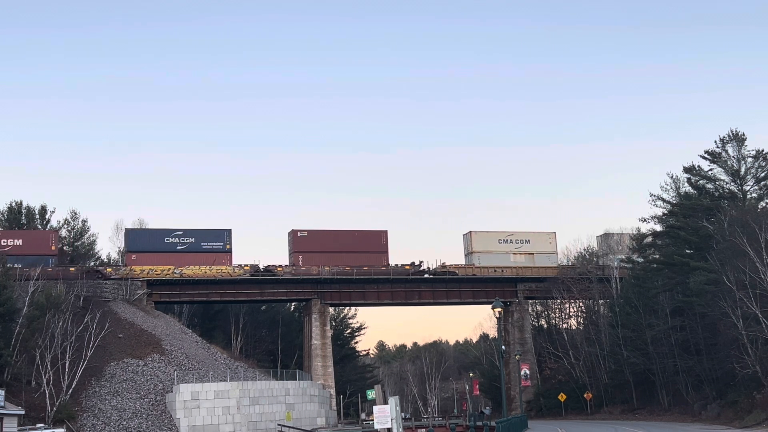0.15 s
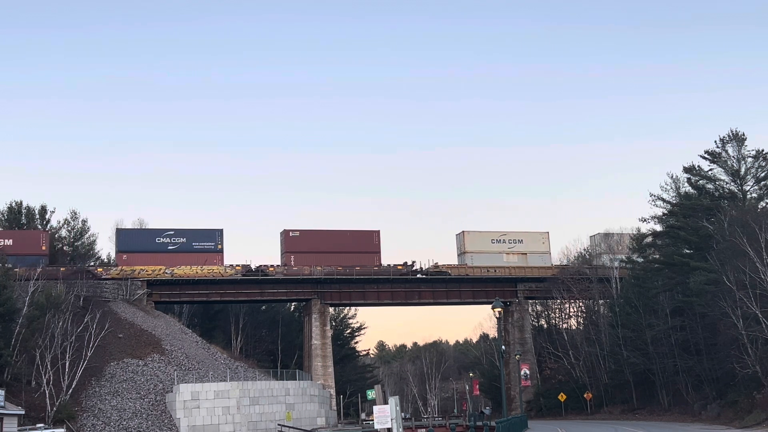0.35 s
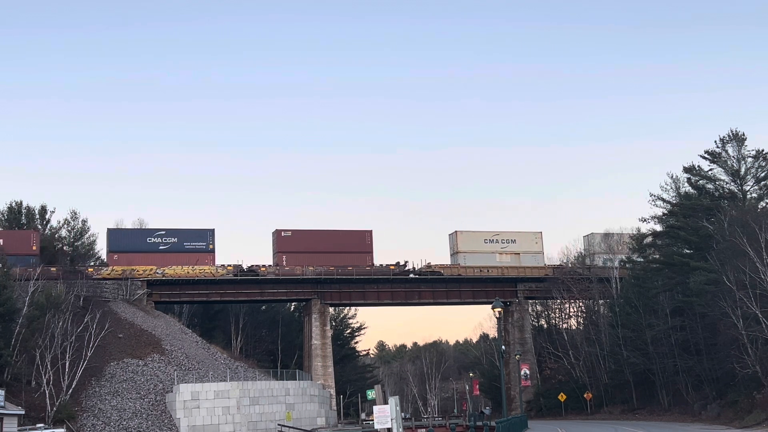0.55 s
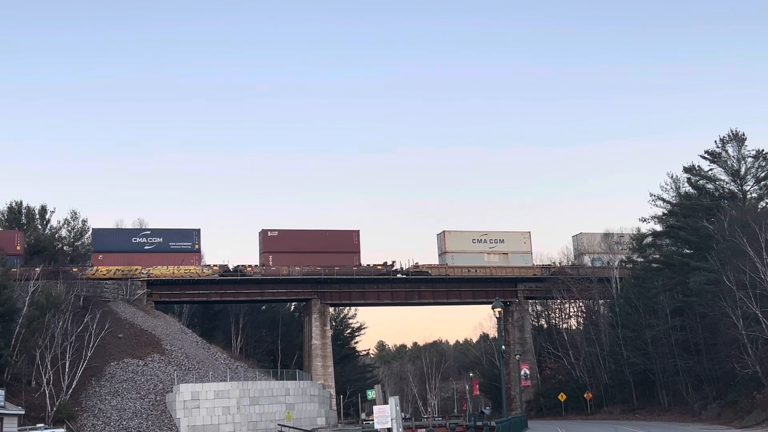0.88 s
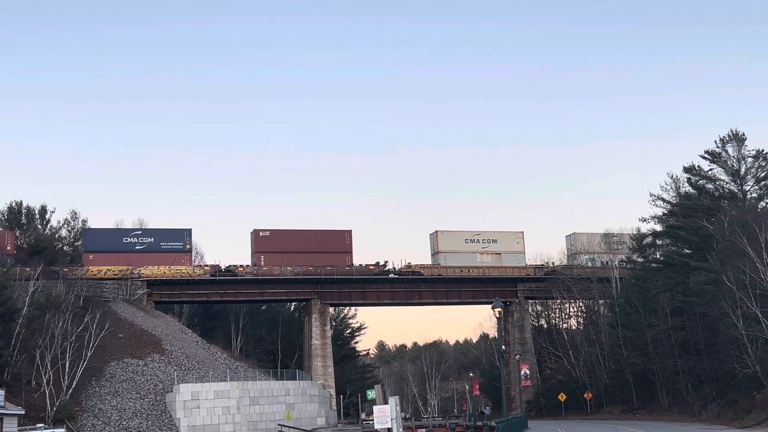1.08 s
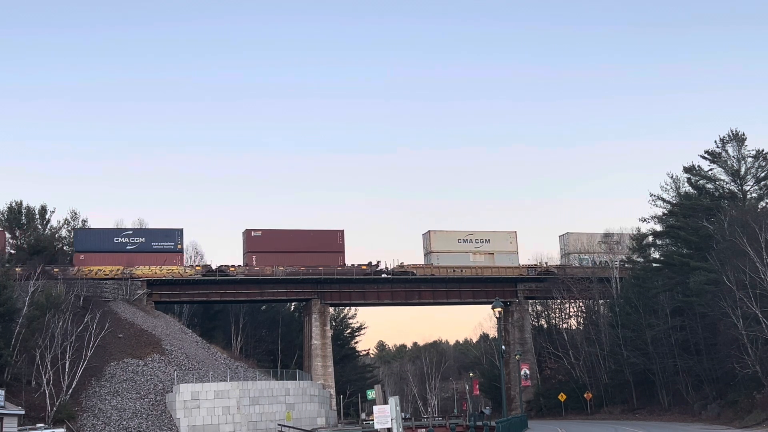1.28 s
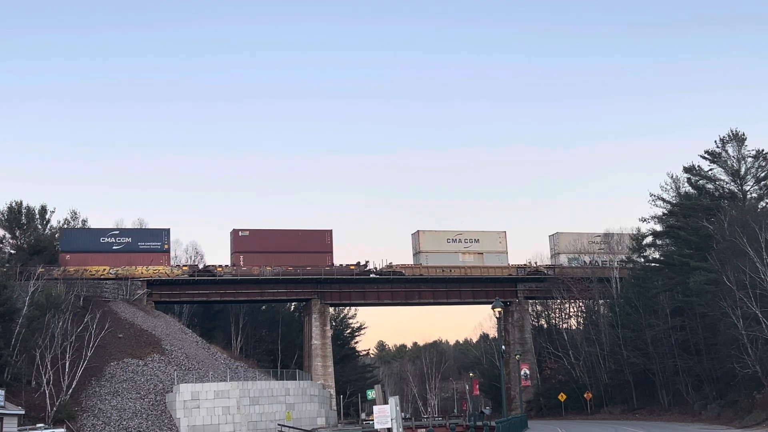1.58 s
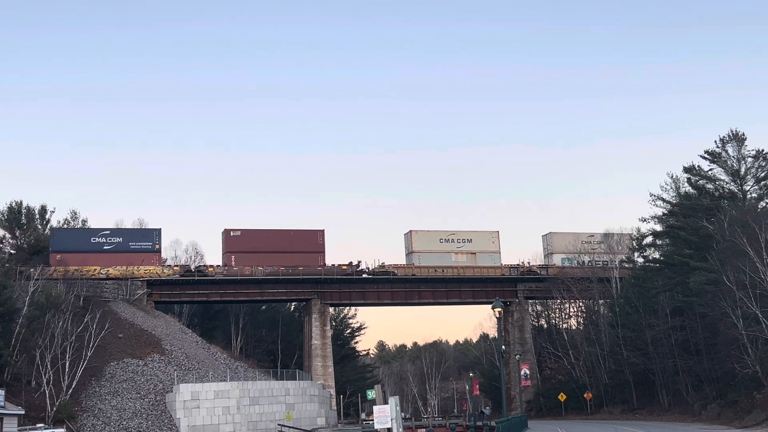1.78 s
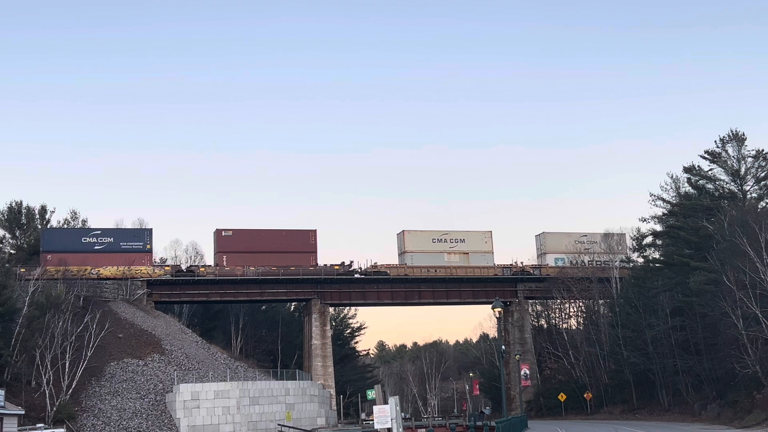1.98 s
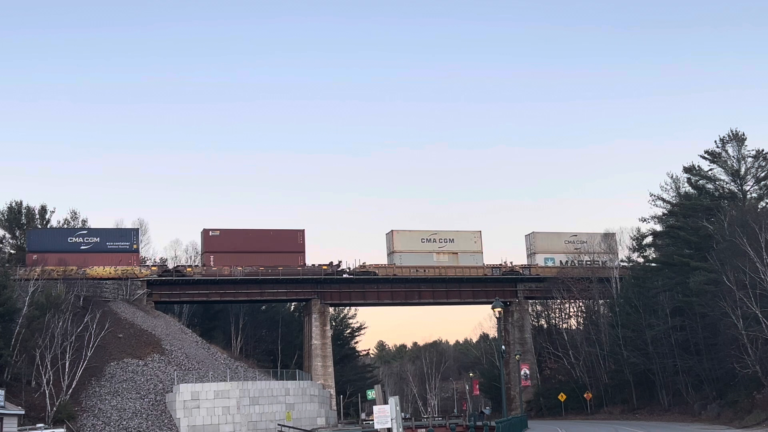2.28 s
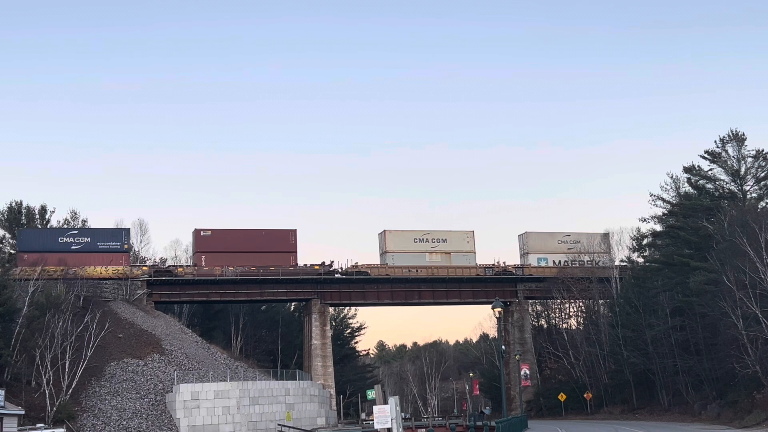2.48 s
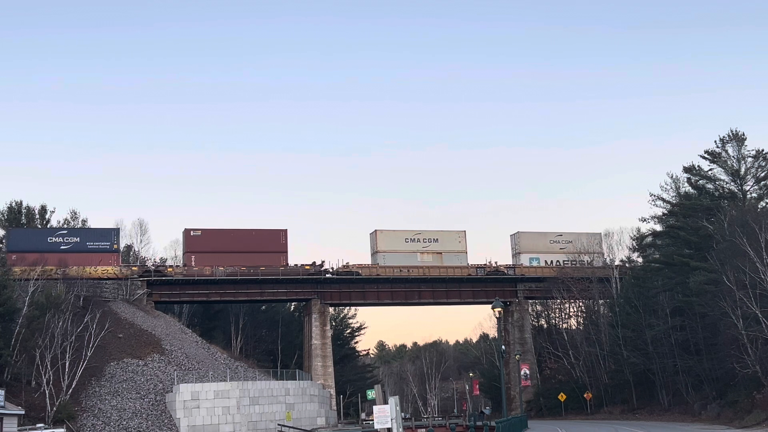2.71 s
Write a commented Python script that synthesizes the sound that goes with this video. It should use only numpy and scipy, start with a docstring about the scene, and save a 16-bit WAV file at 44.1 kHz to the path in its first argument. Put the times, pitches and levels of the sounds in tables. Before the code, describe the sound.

A slow freight train booms across a steel bridge above the listener, axles thudding irregularly over a low drone and light rail hiss. Something small rattles once nearby, then the cars clank far off.

```python
"""A freight train rolls slowly over a steel girder bridge, heard from the road below.
The wheels keep the spans booming, with heavier thuds as loaded axles cross; above that lie a drone
and the roar and hiss of wheel on rail. Steel rings, a wheel sings briefly and cars clank far off.
Something small rattles once close by, with faint rustles, and a few thin, high chirps, probably
a bird's, echo from the trees."""
import sys
import numpy as np
from scipy import signal
from scipy.fft import rfft, irfft, next_fast_len
from scipy.io import wavfile
from scipy.ndimage import uniform_filter1d

SR = 44100
rng = np.random.default_rng(int(sys.argv[2]) if len(sys.argv) > 2 else 0)


def waveform_to_disk(signal):
    """Save audio, clipped to [-1, 1], as 16-bit WAV at the path in sys.argv[1]."""
    frames = np.transpose(np.atleast_2d(signal))
    scaled = np.clip(frames, -1, 1) * 32767
    samples = np.round(scaled).astype(np.int16)
    wavfile.write(sys.argv[1], SR, samples)


N = 125685
TIME = np.arange(N) / SR


# How loud the spans boom. Each row: time in seconds, level in dB.
BOOM_LEVEL = [(0, -23.5), (.06, -37), (.2, -31), (.34, -35), (.44, -29), (.55, -34), (.76, -29),
              (.92, -35.5), (1.1, -31), (1.19, -31.5), (1.255, -40), (1.31, -27), (1.52, -32),
              (1.58, -41.5), (1.68, -27.5), (1.84, -39.5), (2.15, -30), (2.3, -32.5), (2.5, -31.5),
              (2.85, -30)]
# The boom's tone. Each row: frequency in Hz, relative level in dB.
BOOM_TONE = [(18, -50.5), (25, -27.5), (32, -13.5), (41, -5.5), (53, 1), (71, -0.5), (88, -9.5), (115, -9),
             (170, -25.5), (300, -88)]
def boom():
    """The wheels keep the bridge spans shaking."""
    return rolling(BOOM_LEVEL, BOOM_TONE, flutter_db=-2.5)


# Axle thuds. Each row: time in seconds, peak level in dB, pitch in Hz.
THUDS = [(0.106, -18, 72.8), (.149, -20.5, 60), (.279, -14.5, 71.5), (0.4, -19.5, 66.6), (0.761, -15, 59.5),
         (0.993, -25, 72), (1.159, -23, 101.6), (1.189, -18, 59), (1.429, -22.5, 78), (1.528, -22, 61.6),
         (1.928, -20, 63.4), (2.042, -18.5, 55), (2.119, -23, 71), (2.179, -16.5, 69), (2.209, -18, 69.5),
         (2.343, -18.5, 67), (2.521, -27.5, 72), (2.712, -18.5, 57.3)]
def thuds():
    """A heavy axle swings a span for a few cycles."""
    out = np.zeros(N)
    for s, db, hz in THUDS:
        swing = np.cos(2 * np.pi * (hz * (TIME - s) + rng.random()))
        out += from_db(db) * swell(s, rise_s=.017, fall_s=.016) * swing
    return out


# How loud the drone is. Each row: time in seconds, level in dB.
DRONE_LEVEL = [(0, -36.5), (.12, -35.5), (.35, -38), (.48, -36.5), (.66, -35), (.95, -37.5), (1.18, -37.5),
               (1.4, -37.5), (1.58, -38), (1.76, -36), (2.02, -38.5), (2.28, -35), (2.5, -36.5),
               (2.85, -37)]
# Its tone. Each row: frequency in Hz, relative level in dB.
DRONE_TONE = [(40, -50.5), (80, -3.5), (120, 2), (150, -4.5), (185, -11), (290, -12), (400, -18),
              (600, -29), (1500, -82.5)]
def drone():
    """The rolling keeps up a low drone."""
    return rolling(DRONE_LEVEL, DRONE_TONE, flutter_db=.94)


# How loud the roar is. Each row: time in seconds, level in dB.
ROAR_LEVEL = [(0, -49), (.6, -50), (.95, -50), (1.3, -50.5), (1.58, -52.5), (1.7, -49.5), (1.94, -50.5),
              (2, -48.5), (2.3, -47.5), (2.6, -48.5), (2.85, -47.5)]
# Its tone. Each row: frequency in Hz, relative level in dB.
ROAR_TONE = [(100, -44.5), (280, -9), (480, 0), (700, 0.5), (980, -0.5), (1400, -5.5), (1900, -13.5),
             (3000, -36), (6000, -68)]
def roar():
    """Wheels roar on the rails, a touch louder on the right."""
    return rolling(ROAR_LEVEL, ROAR_TONE, flutter_db=2) * from_db([[-.3], [.3]])


# How loud the hiss is. Each row: time in seconds, level in dB.
HISS_LEVEL = [(0, -57), (.5, -58.5), (.68, -58.5), (.9, -62), (1.15, -58.5), (1.45, -58), (1.58, -62.5),
              (1.7, -59.5), (1.87, -56), (1.97, -60), (2.2, -57.5), (2.55, -59.5), (2.7, -58.5), (2.8, -55)]
# Its tone. Each row: frequency in Hz, relative level in dB.
HISS_TONE = [(400, -31), (1000, -7), (1900, -0.5), (2700, -5), (3500, -12.5), (4800, -19), (5700, -25.5),
             (7000, -29), (9500, -42), (12500, -47.5)]
def hiss():
    """The rails hiss under the wheels."""
    return rolling(HISS_LEVEL, HISS_TONE, flutter_db=1.28)


# Ringing steel. Each row: pitch in Hz, width in Hz, level in dB, left-right likeness (1 = same).
RINGS = [(72.37, 11, -42, 1), (248, 2.6, -57, 0.94), (490, 2.2, -66, 0), (1850, 190, -68, 1),
         (2870, 64, -79, 0.61)]
def steel_rings():
    """The rolling keeps wheels and steelwork ringing."""
    return sum(from_db(db) * noise_band(hz - width / 2, hz + width / 2, alike, order=2)
               for hz, width, db, alike in RINGS)


# Far clanks. Each row: time in seconds, peak level in dB, middle frequency in Hz, width in Hz.
CLANKS = [(0.097, -40, 303, 168), (1.646, -63, 3290, 1900), (2.047, -46.5, 1043, 553),
          (2.069, -53, 2010, 738), (2.159, -47, 853, 488), (2.275, -48, 1050, 450),
          (2.285, -38.5, 295, 204), (2.765, -67, 4240, 2800)]
def clanks():
    """Wheels, couplings and car bodies bump, blurred by distance."""
    out = np.zeros((2, N))
    for s, db, hz, width in CLANKS:
        noise = noise_band(hz - width / 2, hz + width / 2, at_hz(LIKENESS, hz), order=3)
        out += from_db(db) * swell(s, rise_s=.012, fall_s=.04) * noise
    return out


# Wheel notes. Each row: start in seconds, length in seconds, pitch in Hz, level in dB.
WHEEL_NOTES = [(0.118, 0.17, 1780, -63.5), (0.112, 0.49, 2880, -69.5), (1.94, 0.16, 950, -51)]
def singing_wheel(fade_s=.048, waver_hz=14):
    """A wheel sticks and slips on the rail, holding a brief, wavering note."""
    out = np.zeros(N)
    for s, length, hz, db in WHEEL_NOTES:
        level = np.clip(np.minimum(TIME - s, s + length - TIME) / fade_s, 0, 1)
        out += from_db(db) * level * sine(hz + waver_hz * drift(60))
    return out


# The rattle's hits. Each row: start in seconds, knock strength in dB, tick strength in dB.
RATTLE_HITS = [(1.037, -28, -53), (1.0427, -27.5, -44.5), (1.049, -57, -46), (1.053, -37, -63),
               (1.0633, -40, -54)]
# Its notes. Each row: pitch in Hz, relative level in dB, seconds to fade by 60 dB.
RATTLE_NOTES = [(1220, -28, 0.0048), (1510, -3, 0.0079), (2050, -15, 0.0061), (4350, -14.5, 0.0046)]
# Its ticks' tone. Each row: frequency in Hz, boost or cut in dB.
TICK_TONE = [(2500, -14), (4500, 1.5), (8500, -6), (10200, -17), (12000, -5), (13300, -6), (15000, -18)]
def rattle(tick_s=.0005, soften_hz=2600):
    """Quick hits on a small object, each a short knock with a bright tick."""
    knocks, ticks = np.zeros(N), np.zeros(N)
    for s, knock_db, tick_db in RATTLE_HITS:
        knocks[int(s * SR)] += from_db(knock_db)
        ticks += from_db(tick_db) * (TIME >= s) * np.exp(-np.abs(TIME - s) / tick_s)
    body = sum(from_db(db) * ring(knocks, hz, fade_s) for hz, db, fade_s in RATTLE_NOTES)
    body = signal.sosfilt(signal.butter(2, soften_hz, fs=SR, output="sos"), body)
    hz = np.maximum(np.arange(N // 2 + 1) * SR / N, 1)
    ticks = irfft(rfft(ticks * rng.standard_normal(N)) * from_db(at_hz(TICK_TONE, hz)), N)
    body = with_echoes(body, echo_db=-3.5, fade_s=.089) * from_db([[-1.5], [1.5]])  # to the right
    return body + with_echoes(ticks, echo_db=-7, fade_s=.2)


# Chirps. Each row: start and length in seconds, first and last pitch in Hz, level in dB.
CHIRPS = [(0.386, 0.051, 6640, 7760, -73.5), (1.71, 0.032, 6850, 7350, -80),
          (1.942, 0.03, 6330, 6300, -65.5), (1.963, 0.2, 6230, 6500, -87), (2.73, 0.043, 6640, 7400, -77)]
def chirps(wobble_hz=90):
    """Thin, sliding whistles echo from the trees."""
    call = np.zeros(N)
    for s, length, start_hz, end_hz, db in CHIRPS:
        along = np.clip((TIME - s) / length, 0, 1)
        hz = start_hz + (end_hz - start_hz) * along + wobble_hz * drift(100)
        call += from_db(db) * np.sin(np.pi * along) * sine(hz)
    return with_echoes(call, echo_db=1, fade_s=.57)


# Faint rustles. Each row: time in seconds, peak level in dB, fall time in seconds.
RUSTLES = [(1.049, -80.5, 0.073), (1.304, -84, .025)]
def rustles():
    """Soft, very high hisses come with and after the rattle."""
    level = sum(from_db(db) * swell(s, rise_s=.032, fall_s=fall) for s, db, fall in RUSTLES)
    return level * noise_band(11600, 14000, alike=.92, order=2)


# How alike left and right sound. Each row: frequency in Hz, likeness (1 = same, 0 = unrelated).
LIKENESS = [(40, 1), (90, 0.97), (170, 0.96), (350, 0.81), (700, 0.61), (1500, 0.21), (2300, 0.91),
            (4500, 1), (9000, 0.39)]
def rolling(levels, tone, flutter_db, bands=9, steady_s=.058):
    """Rough wheels shake the steel: bands of noise flutter separately but share one level curve."""
    size = next_fast_len(N)
    hz = np.maximum(np.arange(size // 2 + 1) * SR / size, 1)
    mid, side = rfft(rng.standard_normal((2, size)))
    spectrum = from_db(at_hz(tone, hz)) * stereo(mid, side, at_hz(LIKENESS, hz))
    place = np.clip(np.log(hz / tone[0][0]) / np.log(tone[-1][0] / tone[0][0]), 0, 1)
    out = np.zeros((2, N))
    for band in range(bands):
        share = np.maximum(1 - np.abs(place * (bands - 1) - band), 0)  # neighbours overlap
        out += irfft(spectrum * share, size)[:, :N] * from_db(flutter_db * drift(15))
    power = uniform_filter1d(np.mean(out ** 2, axis=0), int(steady_s * SR))
    return out / np.sqrt(power) * from_db(np.interp(TIME, *np.transpose(levels)))


def from_db(db):
    """Turn decibels into a multiplier."""
    return 10 ** (np.asarray(db) / 20)


def unit_power(x):
    """Scale to an average power of 1."""
    return x / np.sqrt(np.mean(x ** 2) + 1e-20)


def at_hz(table, hz):
    """Read between a table's rows, spacing pitch by octaves."""
    f, value = np.transpose(table)
    return np.interp(np.log(hz), np.log(f), value)


def drift(rate_hz):
    """A smooth random wander, about 1 in size."""
    r = np.exp(-80 * np.pi * rate_hz / SR)
    slow = signal.lfilter([1], [1, -2 * r, r * r], rng.standard_normal(N // 40 + 2002))[2000:]
    return np.interp(np.arange(N) / 40, np.arange(len(slow)), unit_power(slow))


def stereo(mid, side, alike):
    """Make left and right from a shared part and an opposite part."""
    return np.sqrt(1 + alike) * mid + np.sqrt(1 - alike) * side * [[1], [-1]]


def noise_band(low_hz, high_hz, alike, order):
    """Steady stereo noise between two frequencies."""
    sos = signal.butter(order, [low_hz, high_hz], "band", fs=SR, output="sos")
    mid, side = signal.sosfilt(sos, rng.standard_normal((2, N + SR // 4)))[:, -N:]
    return unit_power(stereo(mid, side, alike))


def swell(peak_s, rise_s, fall_s):
    """Rise smoothly to a peak, then die away."""
    t = TIME - peak_s
    return np.exp(-(np.minimum(t, 0) / rise_s) ** 2 - np.maximum(t, 0) / fall_s)


def sine(hz):
    """A pure note with a changing pitch."""
    return np.sin(2 * np.pi * np.cumsum(hz) / SR)


def ring(clicks, hz, fade_s):
    """Each click starts a note that drops 60 dB in fade_s."""
    r, w = from_db(-60 / (fade_s * SR)), 2 * np.pi * hz / SR
    return signal.lfilter([0, np.sin(w)], [1, -2 * r * np.cos(w), r * r], clicks + 1e-18)


def with_echoes(x, echo_db, fade_s):
    """Add a blur of echoes that drops 60 dB in fade_s."""
    echoes = rng.standard_normal((2, SR)) * from_db(-60 * TIME[:SR] / fade_s)
    echoes /= np.sqrt(np.sum(echoes ** 2) / 2)
    return x + from_db(echo_db) * signal.fftconvolve(x[None], echoes, axes=1)[:, :N]


def scene():
    """The bridge and train ahead, with small sounds around the listener."""
    train = boom() + thuds() + steel_rings() + clanks() + singing_wheel() + drone() + roar() + hiss()
    return train + rattle() + rustles() + chirps()


def record(dry):
    """Cut the deepest bass and the highest treble."""
    low_hz, high_hz = 12, 15500
    dry = signal.sosfilt(signal.butter(2, low_hz, "high", fs=SR, output="sos"), dry)
    return signal.sosfilt(signal.cheby2(12, 70, high_hz, fs=SR, output="sos"), dry)


dry = scene()
out = record(dry)
waveform_to_disk(out)
```